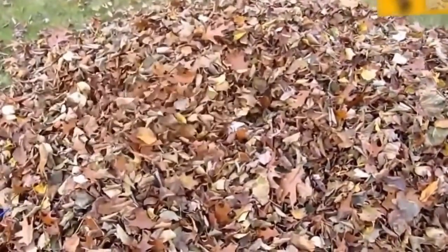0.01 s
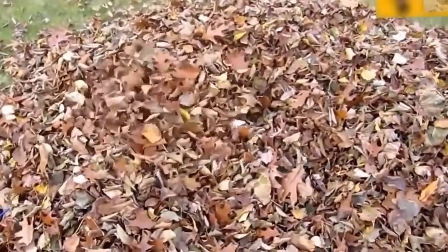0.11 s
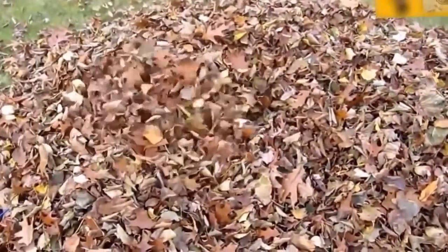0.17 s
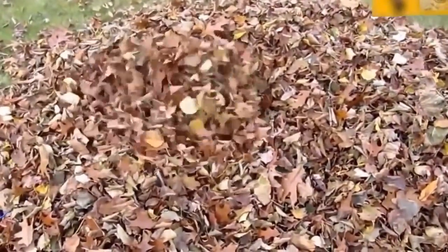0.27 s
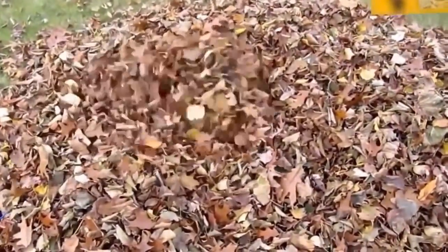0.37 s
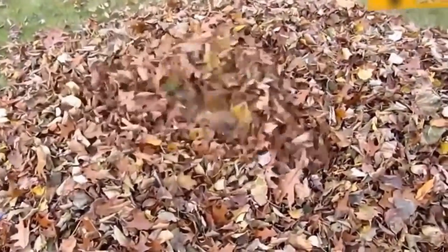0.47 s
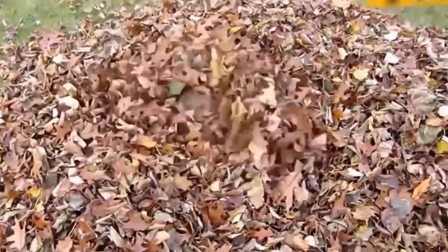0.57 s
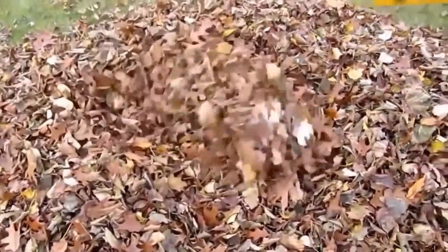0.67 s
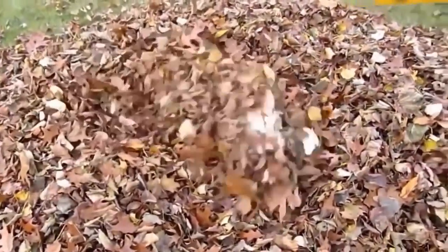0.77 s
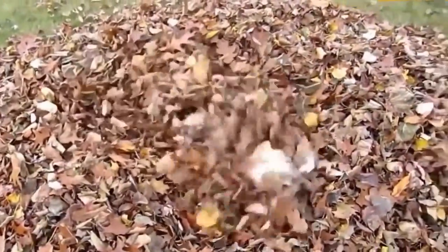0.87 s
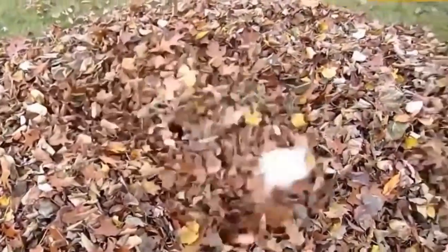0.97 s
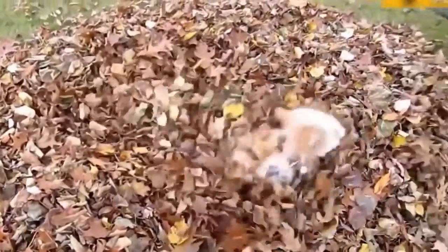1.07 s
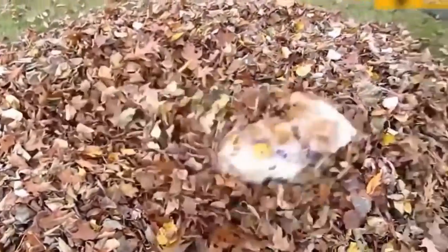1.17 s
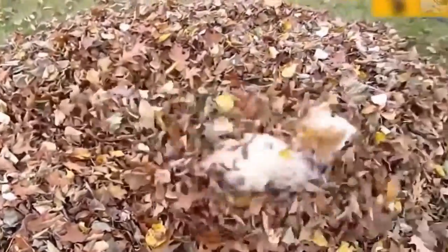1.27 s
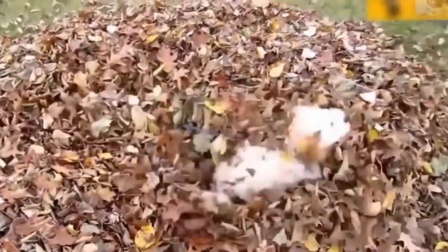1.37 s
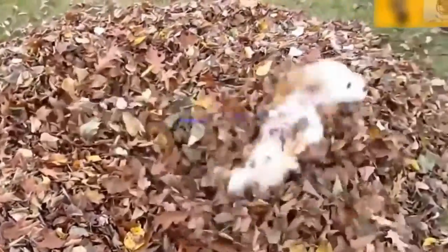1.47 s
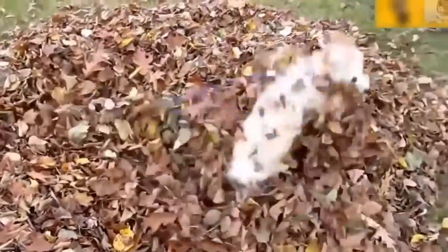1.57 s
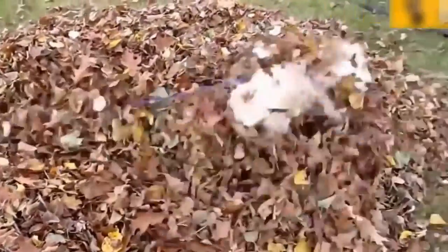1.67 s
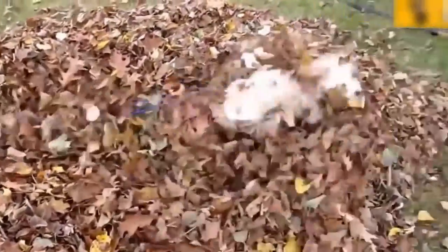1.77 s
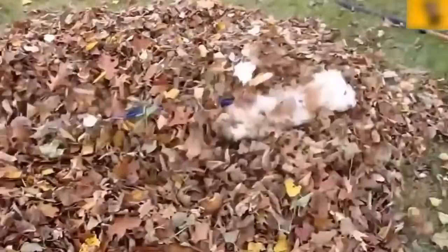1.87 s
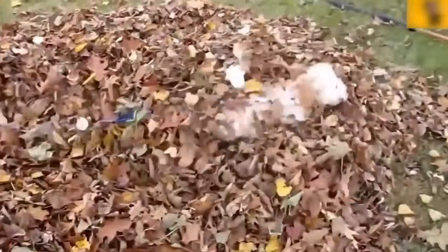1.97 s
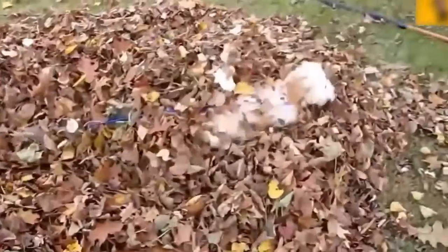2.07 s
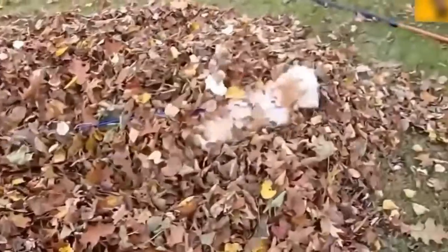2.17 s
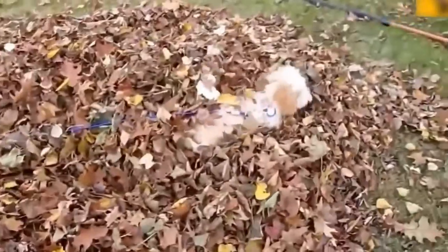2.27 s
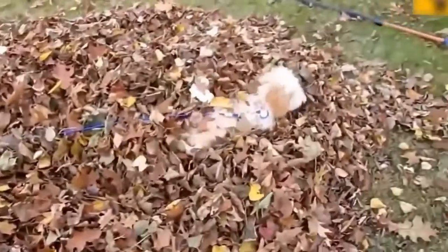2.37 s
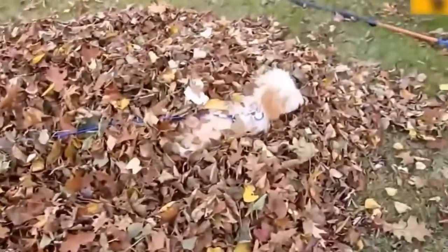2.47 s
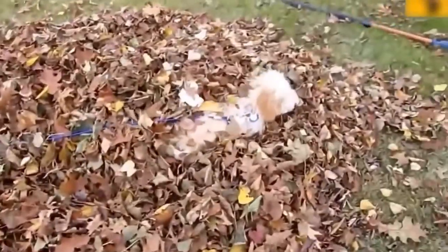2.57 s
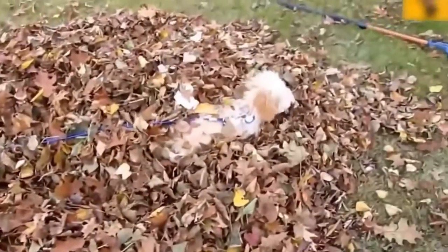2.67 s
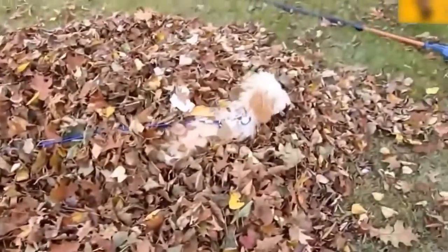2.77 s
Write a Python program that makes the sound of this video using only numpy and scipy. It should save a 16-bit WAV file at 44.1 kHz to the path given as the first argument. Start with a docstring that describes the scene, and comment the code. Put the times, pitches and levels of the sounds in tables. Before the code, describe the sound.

Crisp leaf-pile rustling surges suddenly, keeps thrashing for two seconds, then settles into faint ticks

```python
"""A soft low thump over a quiet outdoor background, then a small dog ploughs through a pile of dry leaves.
Thousands of tiny random leaf cracks merge into a bright rush, with a few sharper snaps on top.
Each thump is a low tone that swells and dies; the background is steady coloured noise.
At the end the dog stops and the thrown leaves settle, the last ones as brief scratches of noise.
The sound is mono: both channels are the same."""
import sys
import numpy as np
from scipy import signal
from scipy.fft import rfft, irfft, next_fast_len
from scipy.io import wavfile
from scipy.ndimage import uniform_filter1d

SR = 44100
rng = np.random.default_rng(int(sys.argv[2]) if len(sys.argv) > 2 else 0)


def dump(signal):
    """Clip the signal to [-1, 1] and save it as 16-bit WAV at the path in sys.argv[1]."""
    limited = np.clip(np.atleast_2d(signal).T, -1, 1)
    pcm = np.round(limited * 32767).astype(np.int16)
    wavfile.write(sys.argv[1], SR, pcm)


N = 125685  # length in samples

# Colour of the cracking leaves. Each row: pitch in Hz, level in dB.
LEAF_COLOUR = [(80, -42), (160, -19), (300, -16.5), (450, -13), (640, -7.5), (820, -2.5), (1020, -4),
               (1450, -3), (2000, -5.5), (2450, -8.5), (3150, -1.5), (3850, -0.2), (4500, -4), (5150, -4.5),
               (5900, -6), (7000, -2.1), (7900, -3), (9200, -0.56), (11500, -4), (13000, -9),
               (14000, -12.5), (15500, -15.5)]


def amp(db):
    """Turns dB into a plain factor."""
    return 10 ** (np.asarray(db) / 20)


def unit(x):
    """Scales a sound to an average (rms) strength of 1."""
    return x / np.sqrt(np.mean(x ** 2) + 1e-20)


def add(mix, s, sound):
    """Mixes a sound in, starting at the given second."""
    part = mix[max(round(s * SR), 0):][:len(sound)]
    part += sound[:len(part)]


def follow(table):
    """Turns each column of a table into a curve over time."""
    times, *columns = np.transpose(table)
    return [np.interp(np.arange(N) / SR, times, column) for column in columns]


def wander(span_s):
    """Smooth random curve of rms 1: only changes slower than about the given time are kept."""
    hz = np.fft.rfftfreq(N, 1 / SR)
    slow_part = np.exp(-(hz * span_s) ** 2)
    return unit(irfft(rfft(rng.standard_normal(N)) * slow_part, N))


def colour(x, points):
    """Filters a sound to the given (Hz, dB) shape, without any sound ahead of its cause."""
    f, db = np.transpose(points)
    size = next_fast_len(2 * N)
    hz = abs(np.fft.fftfreq(size, 1 / SR))
    gain_db = np.interp(np.log(hz + 1), np.log(f + 1), db)
    log_gain = np.log(amp(gain_db))
    # the Hilbert transform finds the phase that makes the filter react only afterwards
    response = np.exp(np.conj(signal.hilbert(log_gain)))[:size // 2 + 1]
    return irfft(rfft(x, size) * response, size)[:N]


def bands(x, order=12):
    """Splits a sound into neighbouring bands that add up to it again."""
    # Edges between the bands, in Hz.
    splits_hz = [2500, 4700, 11000]
    hz = np.fft.rfftfreq(N, 1 / SR)
    rest, out = rfft(x), []
    for edge in splits_hz:
        low = rest / (1 + (hz / edge) ** (2 * order))
        out.append(irfft(low, N))
        rest = rest - low
    return out + [irfft(rest, N)]


def air():
    """Steady far-off outdoor noise: random samples filtered to a colour."""
    # Colour of the background. Each row: pitch in Hz, level in dB.
    air_colour = [(20, -7), (45, -3), (70, 4), (100, 1), (200, -0.5), (420, -2), (850, 2.5), (1500, -8.5),
                  (3000, -13.5), (9500, -16), (12500, -28), (15500, -46)]
    level_db = -52.5
    return amp(level_db) * unit(colour(rng.standard_normal(N), air_colour))


def thumps():
    """Each thump is a low tone that swells to its peak and dies away."""
    # Soft low thumps. Each row: start in seconds, peak in dB, pitch in Hz, swell time in seconds.
    thump_rows = [(0.015, -35.5, 91.5, 0.0025), (0.255, -51, 70, 0.0064), (0.289, -49, 151, .009),
                  (0.56, -52, 75, 0.0094), (0.871, -53, 70, 0.0068), (0.95, -57, 75, 0.0087),
                  (1.155, -52, 65, 0.0067), (1.265, -50, 70, 0.0061), (1.94, -57, 65, .012),
                  (1.978, -40, 85.5, 0.0043), (2.304, -48, 75, 0.0092)]
    out, t = np.zeros(N), np.arange(SR // 5) / SR
    for s, db, hz, swell_s in thump_rows:
        swell = t / swell_s * np.exp(1 - t / swell_s)  # reaches 1 at the swell time
        add(out, s, amp(db) * swell * np.sin(2 * np.pi * hz * t))
    return out


def cracks(per_s, spread_db, decay_s, count=48):
    """Many leaves crack at random moments: each crack is a fading scratch plus a ring at the leaf's pitch."""
    ring_hz, ring_share = (690, 13440), 0.62  # lowest and highest pitch; ring strength beside the scratch
    t, out = np.arange(400) / SR, np.zeros(N)
    for hz in np.linspace(*ring_hz, count):
        # each leaf fades in 0.3 to 2 times decay_s
        fade = np.exp(-t / (decay_s * 2 ** rng.uniform(-1.73, 1)))
        scratch = unit(rng.standard_normal(len(t)) * fade)
        ring = unit(np.sin(2 * np.pi * hz * t) * fade)
        leaf = scratch + ring_share * ring
        # mostly small cracks, a few bigger, pushing either way
        sizes = amp(spread_db * np.minimum(rng.exponential(1, N), 3.5)) * rng.choice([-1, 1], N)
        moments = rng.random(N) < per_s / count / SR
        out += signal.oaconvolve(sizes * moments, leaf)[:N]
    return unit(out)


def ripple(x):
    """Narrow patches of colour lift and dull the sound a little, coming and going as the leaves shift."""
    depth_db, patch_hz, patch_s = 1.74, 149.3, .09  # rms depth, rough width and length of a patch
    hz, t, z = signal.stft(x, SR, nperseg=1024, noverlap=768)
    field = rng.standard_normal(z.shape)
    # averaging over neighbours turns the random grid into patches
    field = uniform_filter1d(field, max(round(patch_hz / hz[1]), 1), axis=0)
    field = uniform_filter1d(field, max(round(patch_s / t[1]), 1), axis=1)
    patched = z * amp(depth_db * unit(field))
    return unit(signal.istft(patched, SR, nperseg=1024, noverlap=768)[1][:N])


def hollow(x, hz, width_hz):
    """Takes away part of one band whose centre follows the curve hz."""
    depth = .3  # share taken away at the centre
    turn = np.exp(2j * np.pi * np.cumsum(hz) / SR)
    r = np.exp(-np.pi * width_hz / SR)
    # shift the centre down to 0 Hz, keep what is near it, shift back up
    near_centre = turn * signal.lfilter([1 - r], [1, -r], x / turn)
    return x - depth * 2 * near_centre.real


def leaves():
    """Dense crinkling and a few sharp snaps, swelling band by band as the dog pushes through."""
    # Loudness of the rustle. Each row: time in seconds, then the levels in dB of the low crush,
    # the crunch, the crackle and the top fizz.
    rustle_levels = [(0.1, -59, -61.5, -61, -71), (0.18, -50, -50, -55, -66),
                     (0.25, -30, -35.0, -36, -47.0), (0.32, -31.0, -28.5, -27.5, -39.0),
                     (0.39, -32.0, -29.5, -26, -36), (0.48, -33, -29.5, -29, -36.5),
                     (0.56, -33.5, -29.5, -26.0, -35), (0.73, -34.0, -30.5, -27, -32.5),
                     (0.8, -34.5, -31.5, -28, -36.0), (0.92, -32.0, -28.5, -25.5, -34.5),
                     (1.08, -32, -31, -27.5, -35), (1.33, -36, -31.5, -26.5, -33),
                     (1.6, -32.5, -32, -28, -34.5), (1.72, -35.5, -34.0, -26, -32.5),
                     (1.9, -34.5, -32, -26.5, -33.5), (2.05, -30, -29.5, -26.5, -36),
                     (2.15, -36, -33, -27.5, -35), (2.23, -42.5, -38.5, -33.5, -43),
                     (2.4, -42.5, -39.5, -35.5, -44.5), (2.48, -44.5, -44.5, -39.5, -49.5),
                     (2.55, -43.5, -43, -39.5, -50), (2.72, -50, -49.5, -47, -55.0),
                     (2.77, -56, -57, -53, -62), (2.8, -55.5, -51, -49, -57.5),
                     (2.85, -62, -66.5, -59, -72)]
    # Two hollows in the colour that slide, mostly upward, as the dog crosses the pile.
    # Each row: time in seconds, lower centre in Hz, upper centre in Hz.
    hollow_path = [(0.3, 4800, 11600), (0.7, 4900, 12400), (1.2, 4840, 13100), (1.38, 6200, 13500),
                   (2.0, 6000, 12900), (2.8, 5500, 12800)]
    hollow_widths_hz = (700, 1200)
    snap_db = -15  # beside the crinkling
    # the loudness wavers very slightly, quickly and more slowly, and a little differently in each band
    quick_s, quick_db = .007, 0.06
    slow_s, slow_db, band_db = 0.027, 0.29, 0.48

    crinkling = ripple(cracks(per_s=22000, spread_db=2, decay_s=0.001))
    snaps = cracks(per_s=120, spread_db=2.0, decay_s=.0001)
    grains = crinkling + amp(snap_db) * snaps
    for hz, width_hz in zip(follow(hollow_path), hollow_widths_hz):
        grains = hollow(grains, hz, width_hz)
    waver_db = quick_db * wander(quick_s) + slow_db * wander(slow_s)
    rush = colour(grains * amp(waver_db), LEAF_COLOUR)
    out = np.zeros(N)
    for band, level_db in zip(bands(rush), follow(rustle_levels)):
        wavering = unit(band * amp(band_db * wander(slow_s)))
        out += wavering * amp(level_db)
    return out


def ticks():
    """The last single leaves drop into place, each a fading scratch of noise."""
    # Each row: start in seconds, level in dB before the leaf colour is put on.
    tick_rows = [(2.619, -42), (2.649, -41), (2.694, -42), (2.715, -45), (2.802, -50)]
    fade_s = .002
    out, t = np.zeros(N), np.arange(SR // 50) / SR
    for s, db in tick_rows:
        add(out, s, amp(db) * np.exp(-t / fade_s) * rng.standard_normal(len(t)))
    return colour(out, LEAF_COLOUR)


def scene():
    """Background, thumps and leaves, the same in both channels."""
    mono = air() + thumps() + leaves() + ticks()
    return np.tile(mono, (2, 1))


def record(dry):
    """The recorder's band limit: a steep filter takes away the sound above its edge."""
    edge_hz = 15680
    low_pass = signal.firwin(1023, edge_hz, window=("kaiser", 9), fs=SR)
    return signal.oaconvolve(dry, low_pass[None], "same")


dry = scene()
out = record(dry)
dump(out)
```